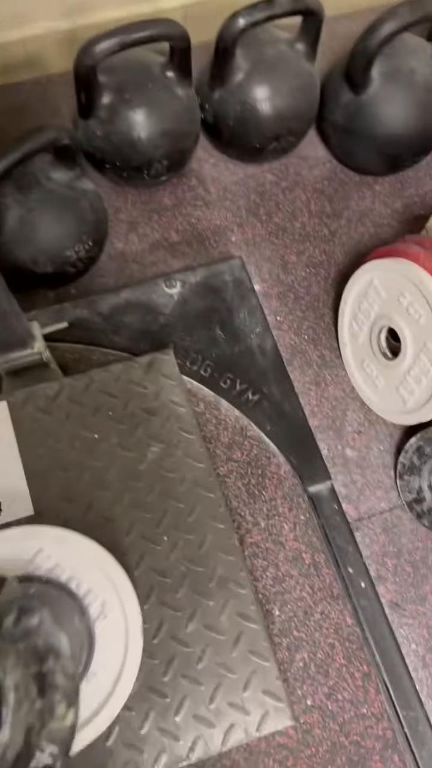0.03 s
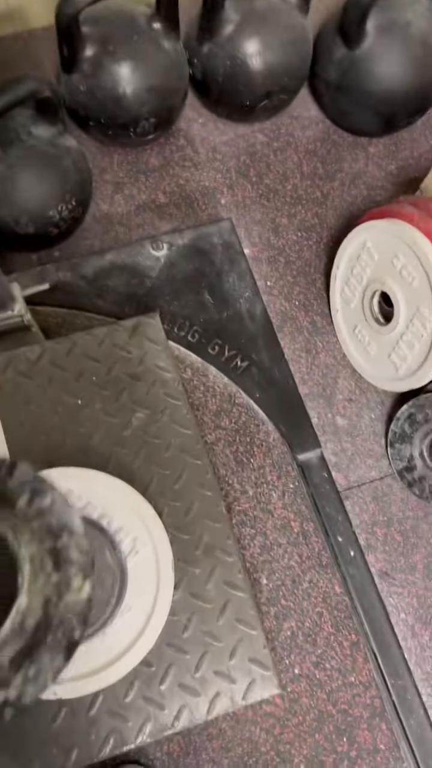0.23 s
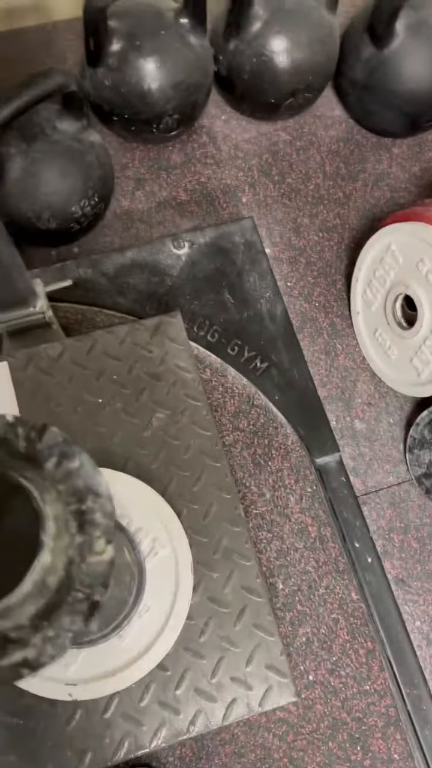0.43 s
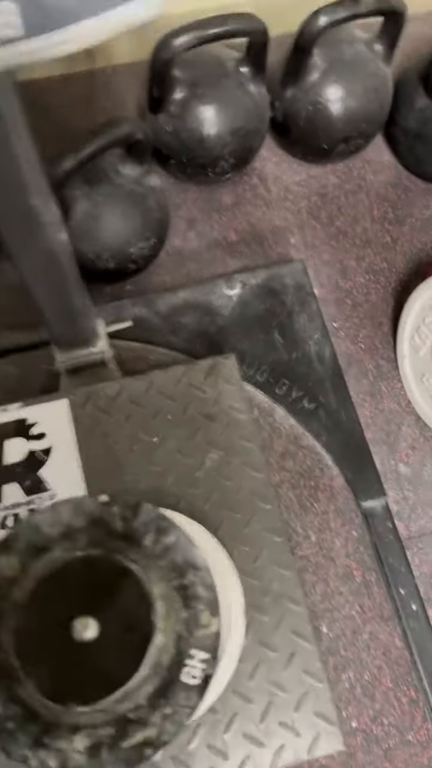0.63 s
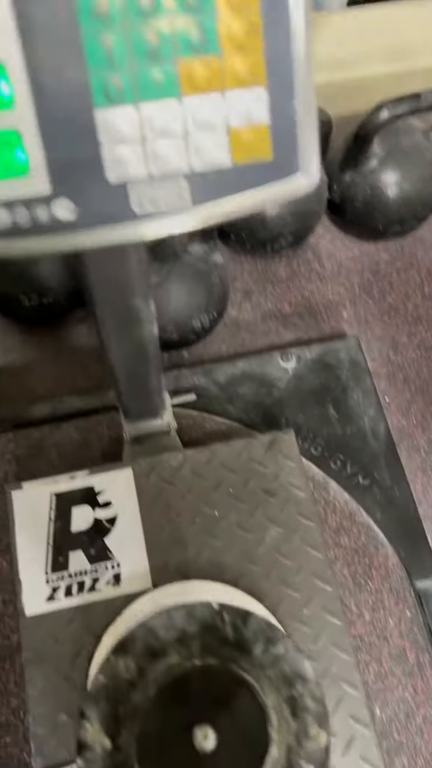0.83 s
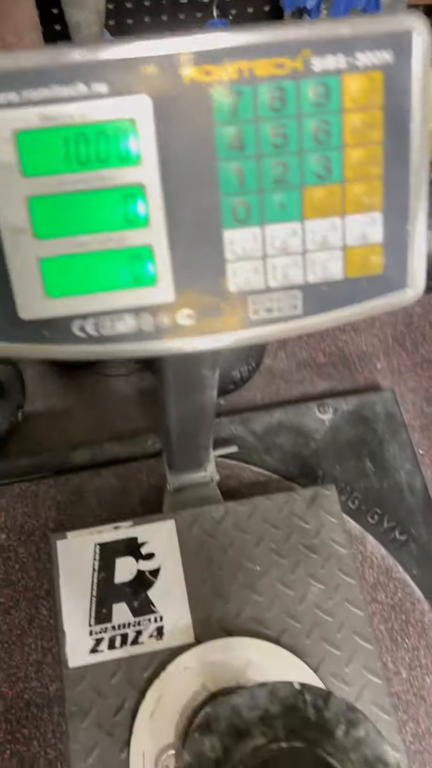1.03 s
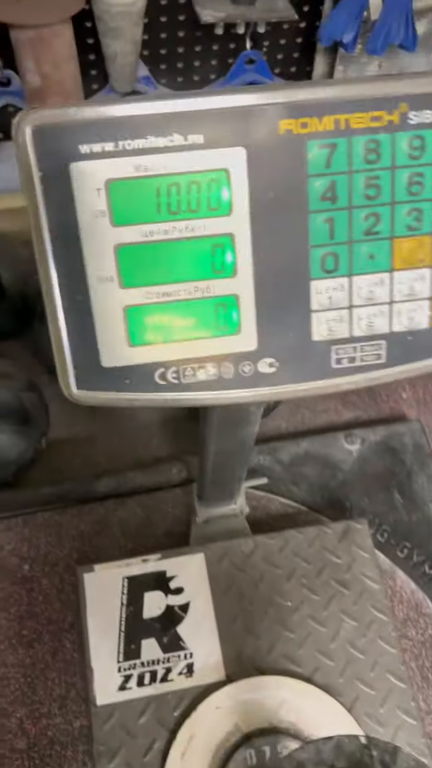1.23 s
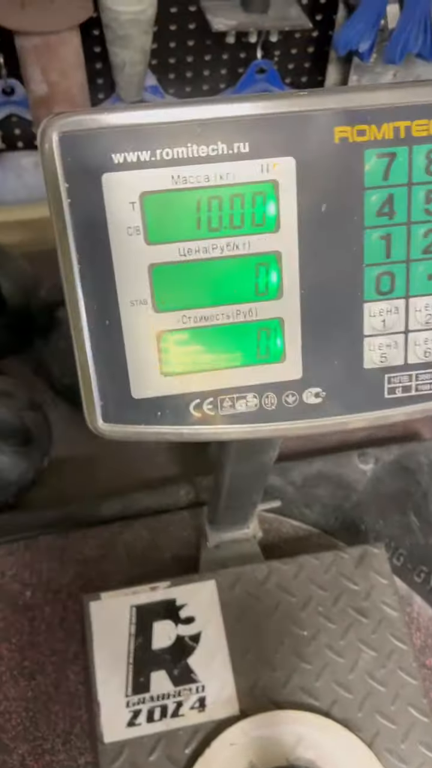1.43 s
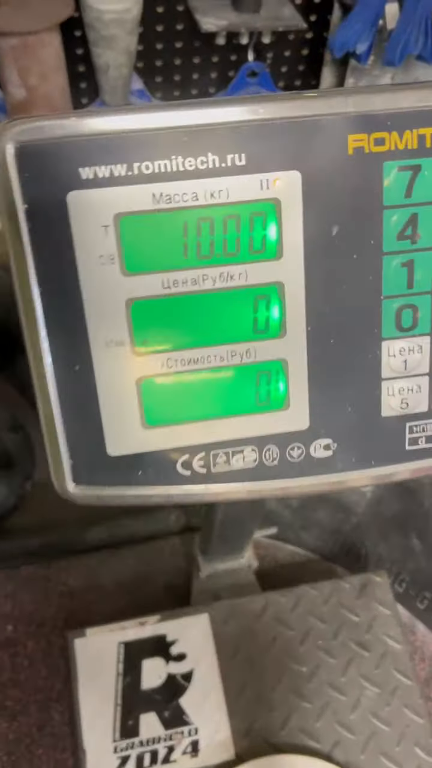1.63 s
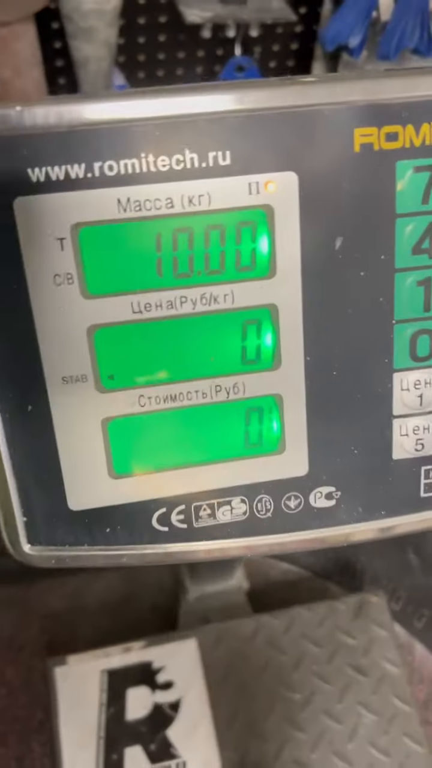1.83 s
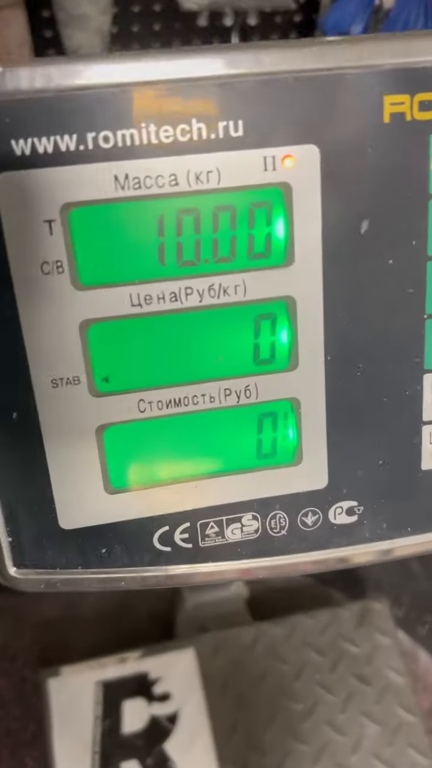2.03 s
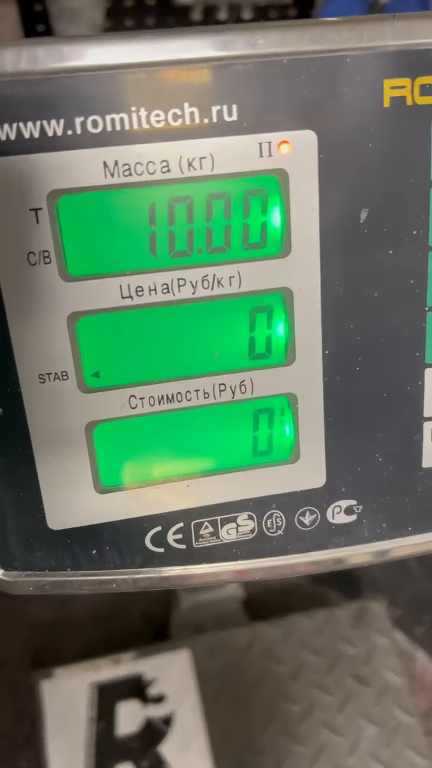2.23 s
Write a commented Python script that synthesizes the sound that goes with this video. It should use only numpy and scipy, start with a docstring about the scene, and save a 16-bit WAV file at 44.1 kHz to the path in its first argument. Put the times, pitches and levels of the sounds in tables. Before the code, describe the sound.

A heavy weight lands on a plate on a steel scale at about 0.2 seconds, close by, with a hollow boom and clang. It rocks in quick hits, with the sharpest iron clacks near 0.45 seconds and a brief judder and chinks around 0.5. Small ticks end by 0.8 seconds. From 1 second, a faint pulsing ring fades amid gym reverberation, soft air noise and a low hum.

```python
"""Over faint air noise and a low hum, a heavy weight lands with a boom on the plate lying on a steel scale.
It rocks for a third of a second, and each impact excites the normal modes of what it strikes: the hollow
platform booms, its deck clangs, iron clacks on iron, a loose steel part chinks and the rim judders.
The platform sways on with a faint pulsing ring, and the gym reverberates around the close sounds."""
import sys
import numpy as np
from scipy import signal
from scipy.fft import irfft, next_fast_len
from scipy.io import wavfile

SR = 44100
rng = np.random.default_rng(int(sys.argv[2]) if len(sys.argv) > 2 else 0)


def generate_wav(signal):
    """Clip the signal to [-1, 1] and save it as 16-bit WAV at the path in sys.argv[1]."""
    frames = np.transpose(np.atleast_2d(signal))
    scaled = np.clip(frames, -1, 1) * 32767
    pcm = np.round(scaled).astype(np.int16)
    wavfile.write(sys.argv[1], SR, pcm)


N = 101429


def undb(db):
    """Amplitude ratio of a level in decibels."""
    return 10 ** (np.asarray(db) / 20)


def clock():
    """Time of every sample in seconds."""
    return np.arange(N) / SR


def fade(t60, size=N):
    """Damping: exponential decay by 60 dB in t60 seconds."""
    return np.exp(-np.log(1000) * np.arange(size) / (SR * t60))


def rise(seconds):
    """First-order build-up with the given time constant."""
    return 1 - np.exp(-clock() / seconds)


def walk(rate):
    """Random drift through rate new values a second, with spread near 1."""
    steps = rng.standard_normal(size=2048)
    return np.interp(clock() * rate, np.arange(len(steps)), steps)


def low_cut(x, hz):
    """Second-order high-pass."""
    return signal.sosfilt(signal.butter(2, hz, "high", fs=SR, output="sos"), x)


def bands(table, size=N):
    """Third-octave bands of noise, each with the table's columns read at its centre."""
    table, padded = np.array(table), next_fast_len(size, True)
    freq = np.fft.rfftfreq(padded, 1 / SR)
    spectrum = np.exp(2j * np.pi * rng.random(len(freq))) * np.sqrt(padded)
    edges = 25 * 2 ** (np.arange(28) / 3)
    for lo, hi in zip(edges, edges[1:]):
        values = [np.interp(np.log(lo * hi) / 2, np.log(table[:, 0]), col) for col in table.T[1:]]
        yield irfft(spectrum * ((freq >= lo) & (freq < hi)), padded)[:size], *values


def dense_modes(table, size=32768):
    """Modal overlap: unresolved modes ring as noise, from rms 1, each band with its own decay."""
    parts = [(noise * undb(db), t60) for noise, db, t60 in bands(table, size)]
    ring = sum(part * fade(t60, size) for part, t60 in parts)
    return np.pad(ring / np.std(sum(part for part, _ in parts)), (0, N - size))


def modes(table):
    """Free vibration: each normal mode is a damped sinusoid."""
    ring, t = np.zeros(N), clock()
    for hz, db, t60 in table:
        size = int(np.clip(2 * t60 * SR, 1, N))
        ring[:size] += undb(db) * np.sqrt(2) * np.sin(2 * np.pi * hz * t[:size]) * fade(t60, size)
    return ring


def strike(times, levels_db, ring):
    """Superposition: each impact starts a scaled copy of the impulse response."""
    hits = np.zeros(N)
    np.add.at(hits, np.clip(np.asarray(times) * SR, 0, N - 1).astype(int), undb(levels_db))
    return signal.fftconvolve(hits, ring)[:N]


def background(air_db=-66, waver_db=1.5, hum_hz=50.5, drift_hz=6):
    """Random modulation: air noise wavers in level; a low hum drifts in pitch and swells once."""
    # Each row: frequency in Hz, relative spectral density in dB.
    air_spectrum = [(25, -20.5), (69, -9.5), (510, -7.5), (907, -14), (1660, -13), (2600, -21),
                    (5660, -23.5), (12000, -47.5)]
    # Each row: time in seconds, level in dB.
    hum_levels = [(0, -65), (1.02, -66.5), (1.07, -60), (1.7, -78)]
    air = sum(noise * undb(db + waver_db * walk(7.5)) for noise, db in bands(air_spectrum))
    phase = 2 * np.pi * np.cumsum(hum_hz + drift_hz * walk(12)) / SR
    hum = np.sqrt(2) * np.sin(phase) * undb(np.interp(clock(), *np.array(hum_levels).T))
    return undb(air_db) * air / np.std(air) + hum


def body(times, levels_db, rise_s, bend_share=.022, waver_db=5.5, waver_rate_hz=30):
    """Energy summation: blows feed the body's modes, which waver as the load shifts."""
    # Each row: frequency in Hz, relative level in dB, t60 in seconds.
    body_modes = [(149.9, -21.5, 1.4), (212.6, -18.5, 1.15), (244.8, -10.5, 0.39), (274, -4.5, 0.34),
                  (316.8, -12, 0.32), (375.2, -14.5, .45), (440, -20, 0.89)]
    out = 0
    for hz, db, t60 in body_modes:
        energy = strike(times, 2 * levels_db, (fade(t60) * rise(rise_s)) ** 2)
        phase = 2 * np.pi * np.cumsum(hz * (1 + bend_share * walk(waver_rate_hz))) / SR
        out += np.sqrt(2 * np.abs(energy)) * undb(db + waver_db * walk(waver_rate_hz)) * np.sin(phase)
    return out


def deck(times, levels_db, detune_share=.022, scatter_db=5):
    """Point excitation: spot and load differ with each blow, so the modes vary in strength and pitch."""
    # Each row: frequency in Hz, relative level in dB, t60 in seconds.
    deck_modes = [(584, -14.5, .14), (735, -12, 0.092), (868, -11.5, 0.16), (914, -2.5, 0.11),
                  (1005.6, -1, 0.07), (1110, -18.5, .1), (1461, -20, 0.21), (1635, -19, 0.27)]
    hz, db, t60 = np.array(deck_modes).T
    out = 0
    for time, level in zip(times, levels_db):
        bend, spot = rng.standard_normal((2, len(hz)))
        ring = modes(zip(hz * (1 + detune_share * bend), db + scatter_db * spot, t60))
        out += strike([time], [level], ring)
    return out


def platform(boom_rise_s=.0059, clang_rise_s=.00035):
    """Impact excitation: each blow sets the hollow body, the deck and the sheet metal vibrating."""
    # Each row: start in seconds, then relative levels of boom, clang and clash in dB.
    blows = [(0.2078, -32, -24, -20), (0.2143, -24, -25.5, -26), (0.2245, -20, -10.5, -22),
             (.256, -20, -21, -38), (.262, -19, -16.5, -37.5), (.278, -25, -27.5, -39.5),
             (0.315, -22, -26.5, -37), (.326, -23, -22.5, -40.5), (.367, -40.5, -27, -30.5),
             (.405, -23.5, -22.5, -34.5), (0.4398, -18, -20, -23.5), (0.4758, -27, -25, -45.5),
             (.489, -34.5, -19.5, -42), (.517, -25.5, -20.5, -48), (.629, -33.5, -52.5, -69)]
    # Dense modes of body, deck and sheet metal.
    # Each row: frequency in Hz, relative spectral density in dB, t60 in seconds.
    boom_bands = [(39.96, -29.5, 0.35), (89.87, -17, 0.53), (168, -25.5, 0.84), (279.2, 2.5, 0.36),
                  (430, -11, 0.6), (756, -16, 0.37), (1500, -49, 0.087)]
    clang_bands = [(250, -16.5, 0.23), (550, -0.5, 0.046), (970, 0.5, .03), (2550, -16, 0.055),
                   (6100, -45, .04)]
    clash_bands = [(300, -17, 0.37), (960, 7.5, 0.29), (2300, -5, 0.62), (2930, -1, 0.3), (3800, -15, 0.72),
                   (5483, -9.5, 0.43), (8126, -14.5, 0.34), (12300, -34, .35)]
    # The deck's brief first flex. Each row: frequency in Hz, relative level in dB, t60 in seconds.
    flex_modes = [(474.3, -5.5, 0.006), (1002, -1.5, 0.038)]
    times, boom_db, clang_db, clash_db = np.array(blows).T
    boom = body(times, boom_db - 3, boom_rise_s)
    boom += strike(times, boom_db - .5, dense_modes(boom_bands) * rise(boom_rise_s))
    flex = (modes(flex_modes) + undb(-1) * dense_modes(clang_bands)) * rise(clang_rise_s)
    clang = strike(times, clang_db, flex) + deck(times, clang_db - 6)
    clash = strike(times, clash_db, dense_modes(clash_bands))
    return boom + low_cut(clang + clash, hz=252)  # clang and clash carry no deep bass


def iron(rattle_count=30):
    """Hard contact gives a wide spectrum: iron clacks on iron amid a rattle of small random impacts."""
    # Each row: start in seconds, then relative levels of snap and dull knock in dB.
    clacks = [(0.368, -33, -27.5), (0.44, -13.5, -12.5), (0.4426, -17, -16), (0.4762, -13.5, -28),
              (0.5137, -27, -29.5), (0.5499, -30.5, -28), (0.691, -41.5, -39)]
    # Each row: frequency in Hz, relative spectral density in dB, t60 in seconds.
    clack_bands = [(150, -32, .03), (1350, -0.5, 0.045), (2850, 1.5, 0.032), (5720, -4, 0.033),
                   (11910, -33.5, .03)]
    # The weight and its seat. Each row: frequency in Hz, relative level in dB, t60 in seconds.
    weight_modes = [(2620, -8.5, .015), (2854, 0, .02), (3470, -19, 0.32), (4640, -8.5, 0.01452),
                    (5650, -7.5, .018)]
    seat_modes = [(1436, 0.0096, 0.012)]
    times, snap_db, knock_db = np.array(clacks).T
    rattle_times = rng.uniform(.21, .56, rattle_count)
    rattle_db = rng.normal(-38, 1.5, rattle_count)
    ring, attack = modes(weight_modes), rise(seconds=.0003)
    snaps = sum(strike([time], [db], (undb(-2) * dense_modes(clack_bands) + ring) * attack)
                for time, db in zip(times, snap_db))
    knocks = strike(times, knock_db, modes(seat_modes) * attack)
    return snaps + knocks + strike(rattle_times, rattle_db, dense_modes(clack_bands))


def loose_steel(contacts=6, length_s=.012, focus_db_per_octave=24):
    """Resonance: a loose part chatters, and its modes near one pitch build up and ring on as a chink."""
    # Each row: start in seconds, relative levels of grit and ring in dB, favoured pitch in Hz.
    chinks = [(0.494, -37.5, -37.5, 5800), (0.514, -30.5, -29.5, 3213), (0.525, -33, -29.5, 6190),
              (0.765, -36.5, -46, 9100)]
    # Each row: frequency in Hz, relative spectral density in dB, t60 in seconds.
    grit_bands = [(303.3, -23.5, 0.11), (3200, 6, 0.16), (4440, -2.5, 0.05), (6100, -1.5, 0.13),
                  (11900, -13, 0.0795)]
    # Each row: frequency in Hz, relative level in dB, t60 in seconds.
    steel_modes = [(3310, 10, 0.08), (5700, -2.5, 0.1011), (6660, 4, 0.15), (6754, -10.5, 0.19),
                   (9285, -6, 0.28), (10060, -2.5, 0.096), (10300, -5, 0.12)]
    out, grit = 0, dense_modes(grit_bands)
    hz, db, t60 = np.array(steel_modes).T
    for start, grit_db, ring_db, pitch in chinks:
        times = start + length_s * (np.arange(contacts) + rng.random(contacts) / 2) / contacts
        tones = modes(zip(hz, db - focus_db_per_octave * np.abs(np.log2(hz / pitch)), t60))
        out += strike(times, grit_db, grit) / np.sqrt(contacts)
        out += strike([start], [ring_db], tones * rise(length_s / 2))
    return out


def judder(start_s=.515, length_s=.045, start_hz=1117.4, sag_hz_per_s=2030, db=-23.5, rough_db=6):
    """Repetition pitch: fast contacts of the rim on the deck fuse into a rough, sinking squawk."""
    t = np.clip(clock() - start_s, 0, length_s)
    hz = (start_hz - sag_hz_per_s * t) * (1 + .014 * walk(305.1))
    swell = undb(db + rough_db * walk(270)) * np.sin(np.pi * t / length_s)
    return swell * np.sqrt(2) * np.sin(2 * np.pi * np.cumsum(hz) / SR)


def sway(start_s=1.03, period_s=.092, waver_hz=9.43):
    """Amplitude modulation: a faint lingering ring pulses with every swing of the platform."""
    # Each row: frequency in Hz, relative level in dB, pulses per swing, depth from 0 to 1.
    sway_tones = [(217, -55, 1, 0.6), (425, -60.5, 2, 1), (1080, -67.5, 1, 1)]
    out, t = 0, clock() - start_s
    envelope = fade(t60=2.33) * rise(seconds=.16)
    for hz, db, pulses, depth in sway_tones:
        pulse = 1 + depth * np.cos(2 * np.pi * pulses * t / period_s)
        tone = np.sqrt(2) * np.sin(2 * np.pi * np.cumsum(hz + waver_hz * walk(30)) / SR)
        out += strike([start_s], [db], envelope) * pulse * tone
    return out


def gym(x):
    """Diffuse reverberation: reflections merge into a noise tail in which the lows stay longest."""
    # Each row: frequency in Hz, relative gain in dB, t60 in seconds.
    room_bands = [(60, -8, 4.5), (220.3, -15, 1.3), (1700, -13, 0.84), (2860, -23.5, 0.99),
                  (5863, -12, 0.65), (12000, -10.5, 0.39)]
    # The square root makes a band's energy independent of its decay time.
    tail = sum(noise * undb(db) * fade(t60) * np.sqrt(2 * np.log(1000) / (t60 * SR))
               for noise, db, t60 in bands(room_bands))
    return signal.fftconvolve(x, tail * rise(seconds=.045))[:N]


def scene():
    """Direct sound, reverberant field and background add linearly."""
    direct = platform() + iron() + judder() + loose_steel() + sway()
    return (direct + gym(direct) + background())[None]


def record(dry, top_hz=11950):
    """Band limiting and soft saturation thin the deep bass, round the peaks and cut the top."""
    thin = low_cut(dry, hz=42)
    rounded = thin / (1 + thin ** 4) ** (1 / 4)
    return signal.sosfilt(signal.ellip(10, .2, 70, top_hz, fs=SR, output="sos"), rounded)


dry = scene()
out = record(dry)
generate_wav(out)
```